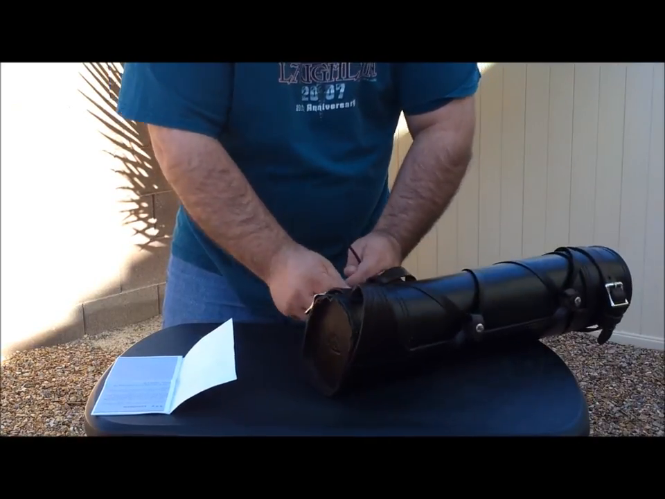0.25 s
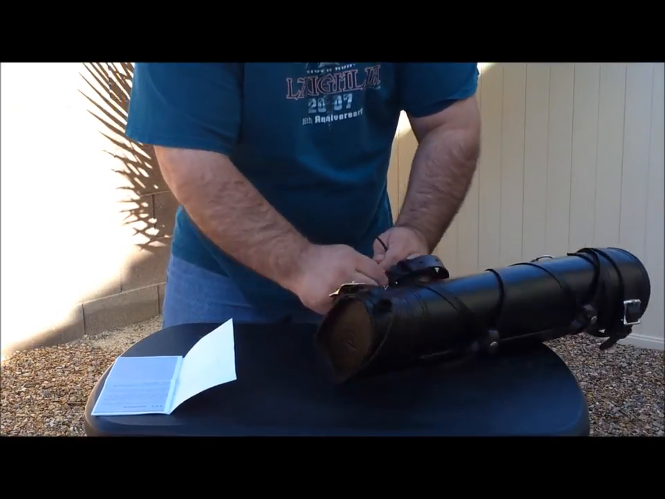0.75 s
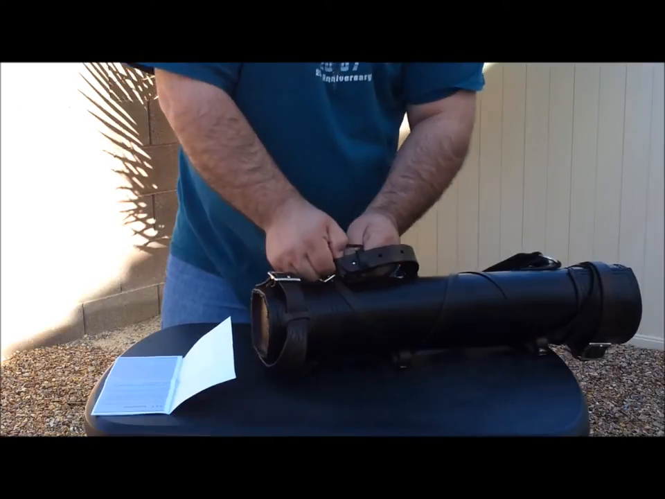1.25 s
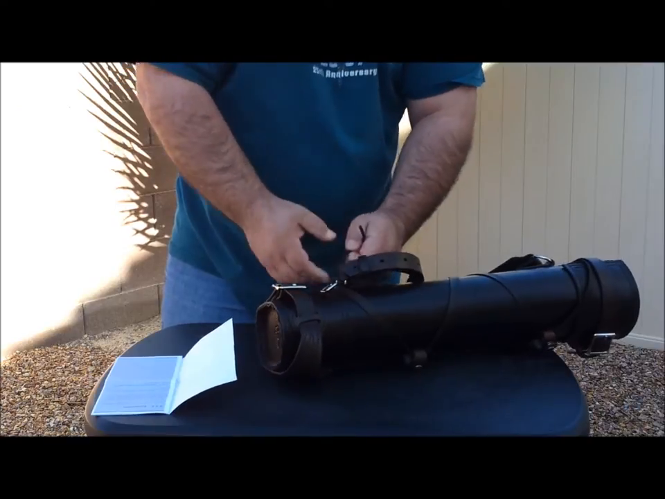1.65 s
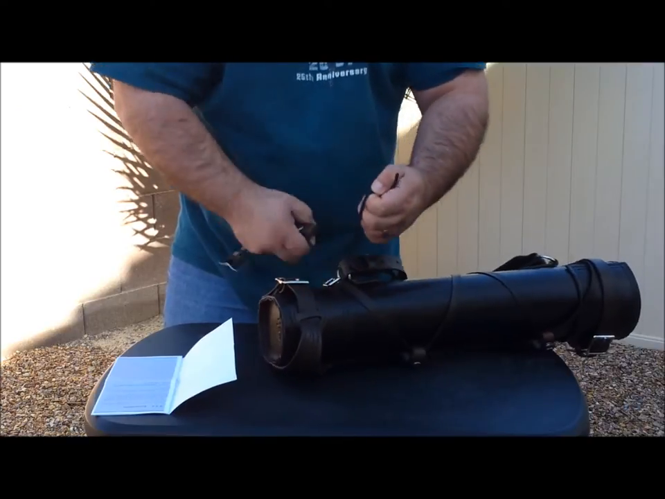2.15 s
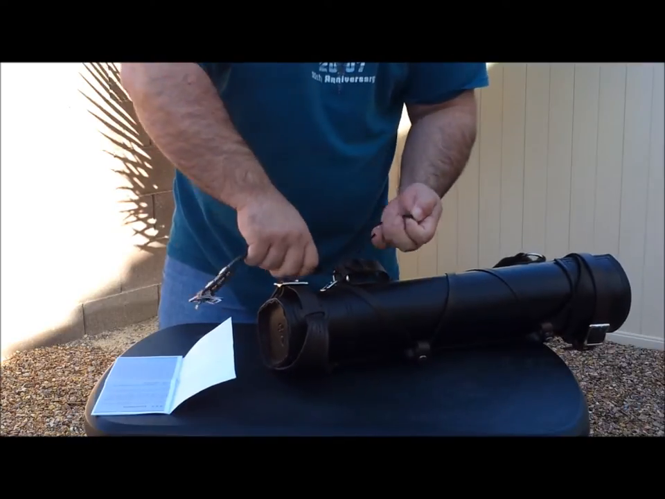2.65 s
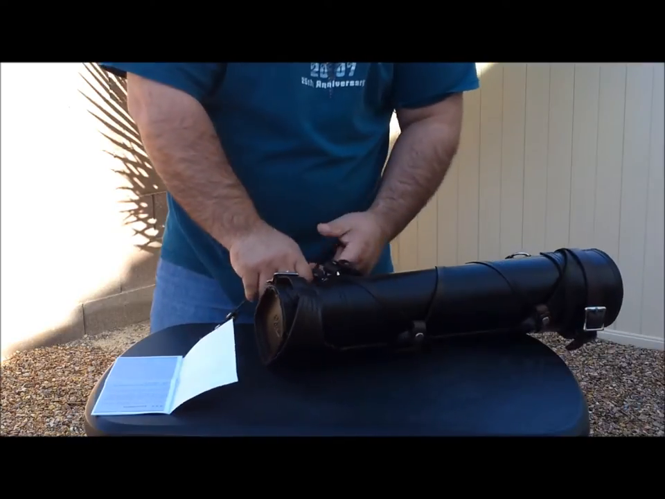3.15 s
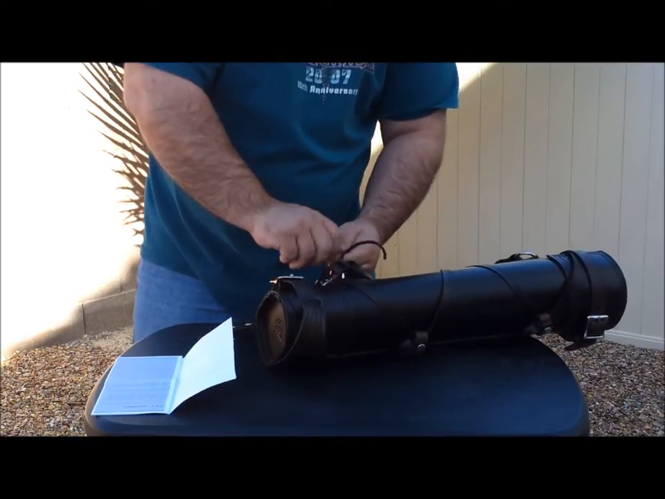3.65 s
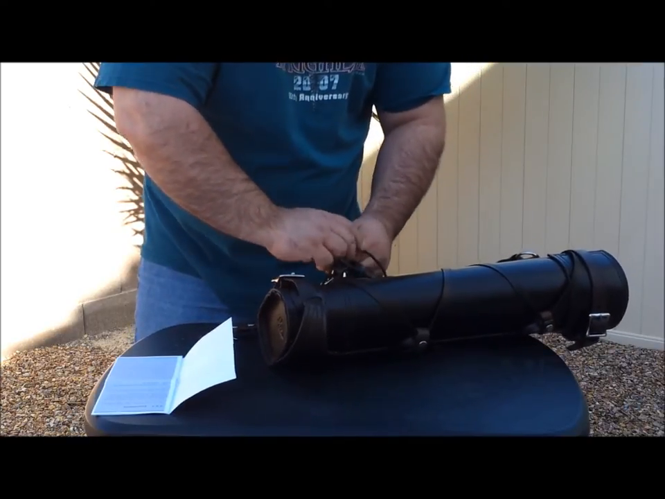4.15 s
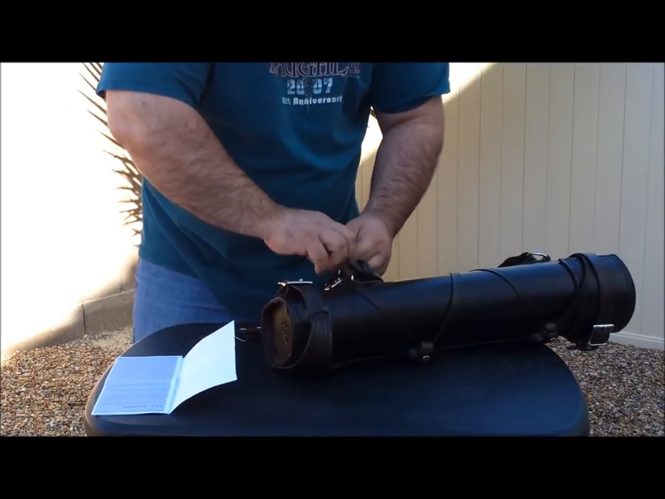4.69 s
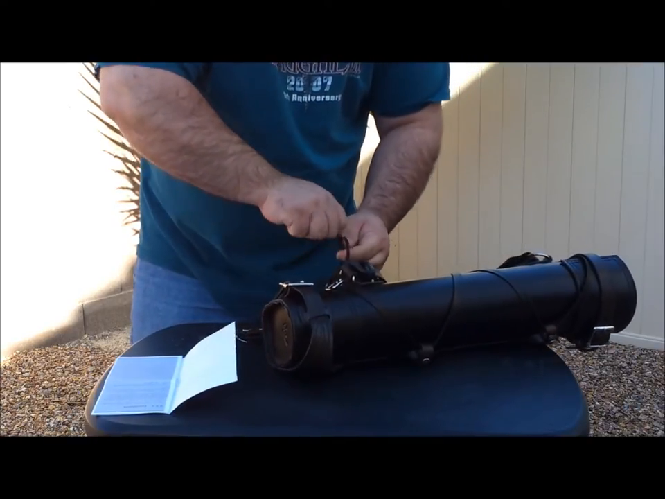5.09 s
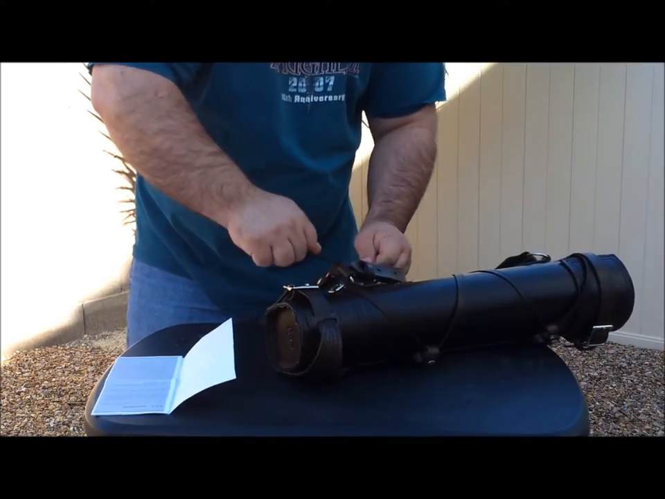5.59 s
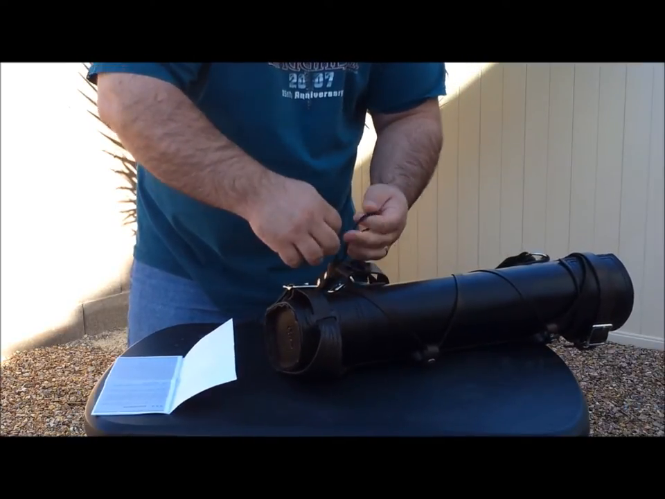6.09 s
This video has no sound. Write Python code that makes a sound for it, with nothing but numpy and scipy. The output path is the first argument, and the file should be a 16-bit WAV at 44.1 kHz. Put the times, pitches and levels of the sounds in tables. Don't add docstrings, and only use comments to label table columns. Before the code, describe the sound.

Close outdoor handling of a leather case on a plastic table. Fingers rustle over straps with small dry ticks, then a knock at two seconds and a harder double knock with buckle clinks at three. Soft bumps and quieter rubbing follow, until a sharp snap, clatter and scraping drag with jingling near five and a half. Faint traffic and microphone hiss stay underneath, with a slight fence reflection.

```python
import sys
import numpy as np
from scipy import signal
from scipy.fft import rfft, irfft, next_fast_len
from scipy.io import wavfile
from scipy.ndimage import uniform_filter1d, map_coordinates

SR = 44100
rng = np.random.default_rng(int(sys.argv[2]) if len(sys.argv) > 2 else 0)


def generate_wav(sig):
    pcm = np.round(np.clip(np.atleast_2d(sig).T, -1, 1) * 32767).astype(np.int16)
    wavfile.write(sys.argv[1], SR, pcm)


def amplitude_ratio(level_db):
    exponent = np.asarray(level_db, float) / 20
    return 10 ** exponent


N = 279136


def unit_size(z):
    return np.sqrt(np.mean(abs(z) ** 2))


def unit(x):
    return x / (unit_size(x) + 1e-10)


def along(points, hz):
    f, v = np.transpose(points)
    return np.interp(np.log(hz + 1), np.log(f + 1), v)


def wobble(rate_hz):
    knots = rng.standard_normal(int(N * rate_hz / SR) + 4)
    return map_coordinates(knots, [np.arange(N) * rate_hz / SR])


def filtered(x, response):
    m = next_fast_len(x.shape[-1] + 8192)
    return irfft(rfft(x, m) * response(np.fft.rfftfreq(m, 1 / SR)), m)[..., :x.shape[-1]]


def noise_through(response, length=N):
    return unit(filtered(rng.standard_normal(length), response))


def resonance(f, hz, width_hz):
    return 1j * f * width_hz / (hz * hz - f * f + 1j * f * width_hz)


def body(modes):
    return lambda f: sum((-1) ** k * amplitude_ratio(db) * resonance(f, hz, 1.28 * width_hz)
                         for k, (hz, width_hz, db) in enumerate(modes))


def ring(t, hz, t60_s, chatter):
    shake = 1 + chatter * 10 * uniform_filter1d(rng.standard_normal(len(t)), size=100)
    onset = 1 - np.exp(-t / 0.00048)
    return shake * np.sin(2 * np.pi * hz * t) * amplitude_ratio(-60 * t / t60_s) * onset


def patchy(x, patchy_db):
    z = signal.stft(x, nperseg=512)[2]
    field = uniform_filter1d(rng.standard_normal(z.shape), size=4, axis=0)
    field = uniform_filter1d(field, size=10, axis=1)
    return signal.istft(z * amplitude_ratio(patchy_db * unit(field)), nperseg=512)[1][:N]


def add(track, start_s, sound):
    track[round(start_s * SR):][:len(sound)] += sound


# freq_hz, density_db
RUMBLE = [(27, -55), (50, -7), (75, -2), (240, -2.5), (400, -11), (800, -20.5), (1600, -31.5), (3520, -120)]
# centre_hz, width_hz, level_db
ENGINES = [(80.7, 16.5, -66.5), (118.6, 22, -71), (159.7, 14, -69.5), (218.5, 24, -68.5)]
# freq_hz, density_db
HISS = [(530, -25), (900, -10), (6560, -9), (7660, -4), (8740, -9), (12400, -3), (14600, -9.5),
        (15700, -48)]


def air():
    traffic = noise_through(lambda f: amplitude_ratio(along(RUMBLE, f)))
    traffic_db = -57.0 + 0.24 * wobble(1.55) + 0.29 * wobble(7)
    drones = np.zeros(N)
    for hz, width_hz, db in ENGINES:
        drone = noise_through(lambda f: resonance(f, hz, width_hz) ** 2)
        drones += amplitude_ratio(db + 2.9 * wobble(1.41)) * drone
    hiss = noise_through(lambda f: amplitude_ratio(along(HISS, f)))
    return amplitude_ratio(traffic_db) * traffic + drones + amplitude_ratio(-69.5) * hiss


def effort(moves):
    peak_s, rise_s, fall_s, db, second_over_db = np.transpose(moves)[..., None]
    late_s = np.arange(0, N / SR + .01, .002) - peak_s
    swell = amplitude_ratio(2 * (db - 20 * np.maximum(late_s / fall_s, -late_s / rise_s)))
    return swell.sum(axis=0), (swell * amplitude_ratio(2 * second_over_db)).sum(axis=0)


def grit(grain_db):
    slips = uniform_filter1d(rng.standard_normal(N), size=24) * np.sqrt(24)
    return rng.standard_normal(N) * amplitude_ratio(grain_db * np.clip(slips, -3, 2))


# freq_hz, density_db
FINGERS = [(2940, -40), (5000, -5.5), (6930, -5), (8220, -4.5), (12300, 6.5), (14400, -0.5), (15100, -29),
           (15500, -62)]
# freq_hz, density_db
RUB = [(1500, -13), (2600, 0.5), (4100, 1), (6000, -6), (8500, -10.5), (13000, -18)]
# centre_hz, width_hz, level_db
TABLE = [(948, 80, -2.5), (1267, 85, 1.5), (1698, 130, -3.5), (2176, 57, -2), (2414, 37, -6.5),
         (3000, 52, -18)]
# centre_hz, width_hz, level_db
CASE = [(487, 51, -1), (634, 42, -0.5), (846, 164, -3), (1208, 55, -6.5), (1696, 32, -9)]
# peak_s, rise_s, fall_s, skin_db, leather_over_skin_db
STROKES = [(.098, .16, .14, -72.5, -3), (.362, 0.14, 0.1, -58, -10), (.52, 0.078, 0.82, -66, -9.5),
           (.87, 0.36, 0.099, -59.5, -5.5), (.972, 0.27, 0.62, -57.5, -8), (1.31, 0.25, 0.056, -63.5, -16),
           (1.436, 0.079, 1.1, -62.5, -7.5), (1.7, 0.13, 1.4, -69, -4), (1.96, 0.06, 0.23, -58.5, -10),
           (2.204, 0.19, 0.23, -56, -18), (2.27, .1, 0.093, -64, -7), (2.628, .06, 0.11, -62, -17),
           (2.866, .6, 0.94, -68, -7.5), (3.282, 0.059, 0.022, -63, -5), (3.25, .15, 0.19, -71, 3),
           (3.62, 0.1, 0.31, -65, -5), (3.812, 0.046, 0.049, -64, -17), (4.166, 0.12, 0.67, -69, -12),
           (4.6, 0.18, .03, -63, -8), (4.8, 0.61, 1.3, -70.5, -10.5), (5.335, 0.14, 0.22, -56.5, -14),
           (5.46, 0.11, 0.018, -56, -7), (5.66, 0.13, 0.16, -60, 0.5), (5.738, .3, 0.037, -68, -7)]
# peak_s, rise_s, fall_s, table_db, case_over_table_db
SHIFTS = [(.098, .28, .25, -74, 1), (.362, .3, 0.21, -67, 0.5), (.694, 0.36, 1.8, -68, 2.5),
          (.95, 0.13, 0.35, -64, 1.5), (1.436, 0.22, 1, -69.5, 1.5), (1.7, 0.096, 1.5, -80, 1),
          (1.96, 0.12, 0.13, -73.5, -4), (2.1, 0.077, 0.12, -57, -5), (2.27, 0.3, 0.32, -72, 4),
          (2.63, .2, 0.4, -77.5, 6), (3.07, 0.16, 0.07, -58, -5), (3.28, .35, .08, -67.5, 10.5),
          (3.42, 0.044, 0.13, -70, 9), (3.56, 0.17, 0.18, -75, 12.5), (3.64, 0.06, 0.18, -63, 8),
          (3.73, 0.089, 0.089, -66, 11), (3.85, 0.025, 0.039, -69, -9), (4.17, 0.17, 0.82, -78, 8),
          (4.44, 0.83, 0.023, -76.5, 8.5), (4.6, 0.14, .03, -71, 7), (5.335, 0.054, 0.35, -70.5, 14.5),
          (5.48, 0.065, 0.22, -51.5, 0), (5.66, 0.2, 0.13, -49, -8), (5.75, .3, 0.057, -56.5, 0.5),
          (6.054, 0.21, 0.38, -73.5, 4)]
REST_DB = [-75.5, -84, -82.5, -79.5]


def handling():
    skin, leather = effort(STROKES)
    table, case = effort(SHIFTS)
    leather = leather + amplitude_ratio(2 * -10.5) * table
    powers = np.array([skin, leather, table, case]) + amplitude_ratio(2 * np.array(REST_DB))[:, None]
    step = np.arange(N) / SR * 500
    finger_gain, rub_gain, drag_gain, rock_gain = [
        np.interp(step, np.arange(len(p)), np.sqrt(p)) for p in powers]

    fingers = unit(filtered(grit(grain_db=3), lambda f: amplitude_ratio(along(FINGERS, f))))
    rub = unit(filtered(grit(grain_db=3.5), lambda f: amplitude_ratio(along(RUB, f))))
    drag = unit(filtered(grit(grain_db=3.5),
                         lambda f: body(TABLE)(f) + 0.26 * resonance(f, 1840, 2100) ** 2))
    rock = unit(filtered(grit(grain_db=3),
                         lambda f: body(CASE)(f) + 0.13 * resonance(f, 670, 820) ** 2))
    jerk = amplitude_ratio(0.48 * wobble(25))
    strap_and_case = rub_gain * rub + drag_gain * drag + rock_gain * rock
    return amplitude_ratio(1.2 * wobble(27)) * finger_gain * fingers + jerk * strap_and_case


# start_s, peak_db, pitch_hz
TAPS = [(.708, -57, 1030), (1.511, -46.5, 1300), (2.812, -60, 826), (3.404, -54, 864), (3.854, -41.5, 1260),
        (5.362, -41, 1710), (5.641, -42, 1750)]
# start_s, peak_db, pitch_hz
CREAKS = [(.9492, -46, 5500), (.9633, -41, 4600), (.9641, -40, 6850), (.9695, -45, 6000),
          (.9827, -40, 5600), (1.0122, -36.5, 5740), (1.033, -48.5, 5190), (1.0427, -40, 5530),
          (1.0768, -40, 5640), (1.09, -51, 4200), (1.0932, -44, 5160), (1.401, -49, 4760),
          (1.4666, -45, 6870), (2.1304, -46, 4650), (2.2747, -36, 5800), (2.8275, -52, 5300),
          (3.4221, -53, 4740), (3.5498, -55, 4890), (3.6267, -54, 4550), (4.5585, -53, 5640),
          (4.5944, -54, 4910), (5.347, -35, 4730), (5.432, -22, 4950), (5.4363, -28, 4870),
          (2.9563, -30, 3700)]
# start_s, peak_db, pitch_hz
SNAPS = [(.9492, -33, 12500), (0.9633, -26, 13000), (1.0122, -45, 12500), (1.394, -45.5, 10000),
         (1.466, -34, 12000), (1.5024, -43, 12100), (2.1368, -36, 12900), (2.2684, -48, 12400),
         (2.2742, -42, 13200), (2.6364, -46, 12700), (2.7545, -40, 13100), (2.76, -41, 12700),
         (2.827, -35, 13300), (3.1832, -44, 12100), (3.2799, -46, 12300), (3.327, -30, 12200),
         (3.709, -50, 9400), (3.803, -52, 12200), (3.81, -51, 13500), (3.817, -50, 13400),
         (5.4325, -12, 12700), (0.946, -39, 12000), (4.6608, -44, 12690), (5.4874, -49, 11400),
         (5.5044, -46, 11400), (5.7084, -44, 12900), (5.7805, -48, 12500), (6.0494, -52, 12100)]
TICK_CYCLES = [5.1, 4.9, 13]


def ticks():
    track, t = np.zeros(N + SR), np.arange(SR // 40) / SR
    overtone_ratio, overtone_db = 1.84, [-17, -6, -70]
    for rows, cycles, over_db in zip([TAPS, CREAKS, SNAPS], TICK_CYCLES, overtone_db):
        for start_s, db, hz in rows:
            u = 6 * t * hz / cycles
            tone = np.sin(2 * np.pi * hz * t)
            overtone = amplitude_ratio(over_db) * np.sin(2 * np.pi * overtone_ratio * hz * t)
            add(track, start_s, amplitude_ratio(db + 7.0) * (tone + overtone) * u * np.exp(-u))
    return track[:N]


# freq_hz, t60_s
FENCE = [(200, 0.12), (1000, 0.26), (4000, 0.46), (12000, 0.16)]


def fence(x):
    frames = dict(nperseg=256, noverlap=192)
    hz, t, z = signal.stft(np.pad(x, (400, 0))[:N], SR, **frames)
    decay = amplitude_ratio(-120 * t[:300] / along(FENCE, hz)[:, None])
    decay = decay / decay.sum(axis=1, keepdims=True)
    power = signal.fftconvolve(abs(z) ** 2, decay, axes=1)[:, :len(t)]
    noise = signal.stft(rng.standard_normal(N), SR, **frames)[2]
    return signal.istft(np.sqrt(abs(power)) * noise / unit_size(noise), SR, **frames)[1][:N]


# start_s, level_db, pitch_hz
NUDGES = [(3.166, -51.5, 1010), (3.185, -55, 1690), (3.2, -50.5, 550), (3.222, -55, 1680),
          (3.232, -48, 485), (3.25, -50, 900), (3.26, -56.5, 1700), (3.268, -53, 1160), (3.285, -51, 850),
          (3.29, -50, 500), (3.305, -59.5, 1690), (3.403, -51.5, 900), (3.42, -51, 850),
          (3.432, -50.5, 590), (3.49, -59.5, 840), (3.53, -54, 620), (3.553, -51, 610), (3.555, -64, 1690),
          (3.585, -56, 600), (3.612, -57.5, 1680), (3.626, -46, 860), (3.643, -46, 900), (3.65, -50, 1210),
          (3.665, -49.5, 860), (3.685, -56.5, 1720), (3.703, -48, 880), (3.705, -55, 1690),
          (3.714, -44.5, 600), (3.722, -48, 484), (3.74, -52, 600), (3.75, -59.5, 1700), (3.856, -55, 1250),
          (.93, -55, 1150), (.975, -56, 1150), (1.03, -56, 1100), (1.1, -57, 1150), (5.358, -43, 1700),
          (5.361, -44, 1050), (5.367, -45, 700), (5.508, -49, 1700), (5.638, -44, 1700), (5.725, -50, 1700),
          (5.745, -50, 1700)]


def nudges():
    rise_s, spread = .0055, .4
    track, u = np.zeros(N + SR), np.arange(SR // 10) / SR / rise_s
    for start_s, db, hz in NUDGES:
        rough = noise_through(lambda f: body(CASE)(f) * resonance(f, hz, spread * hz) ** 2, len(u))
        add(track, start_s, amplitude_ratio(db - 4.0) * u * np.exp(1 - u) * rough)
    return track[:N]


# start_s, level_db, thud_over_db, crack_over_db, t60_s
KNOCKS = [(.9484, -61, 2, 8, 0.14), (2.0339, -36.5, -9, 1, .1), (2.0376, -37.5, -8, -4, 0.23),
          (2.956, -33.5, 0, -3.5, 0.12), (2.9702, -35.5, -2, 12.5, 0.14), (2.9845, -40.5, -6, -1, 0.2),
          (2.9964, -46.5, -5, -6, 0.2), (3.6274, -50.5, -3, -5, 0.052), (3.708, -72, 9, 11, 0.14),
          (4.5601, -64, 10, 13.5, 0.18), (5.3478, -52, 2, 10.5, .16), (5.3585, -45, -4, -6, 0.12),
          (5.4325, -34, -9, 6, .05), (5.4356, -37, 2, 3, 0.12), (5.4455, -38, -5, -3, 0.1),
          (5.4192, -51, -6, -1, 0.4), (3.311, -72, 12, 26, 0.23), (5.4265, -42, -5, -6, .3)]
# freq_hz, gain_db
SLAP = [(60, -30), (200, 0), (2400, -0.5), (3200, -5.5), (4100, 1.5), (5200, -4), (7000, -0.5)]
# pitch_hz, level_db, t60_s
CASE_END = [(242, -39, 0.14), (508, -38, 0.11), (731, -28.5, 0.13), (912, -33, 0.11), (1030, -31, 0.057),
            (1290, -32.5, 0.074), (2380, -42, .076), (2940, -30.5, .047), (800, -40.5, 0.23),
            (1910, -43, .2), (2240, -38, 0.065), (3760, -48, .1), (4090, -37, 0.025), (5450, -46, .07)]
TABLE_RIM = [(286.5, -33, 0.16), (353, -34.5, 0.049), (1100, -38.5, 0.2), (1675, -38, 0.15),
             (2080, -39, 0.18), (2740, -40.5, 0.094), (3780, -28.5, 0.019)]
CASE_SIDE = [(304, -39, 0.15), (720, -53, 0.067), (960, -28.5, 0.074), (1080, -30.5, 0.054),
             (1380, -38, .09), (1960, -26, .04), (2156, -24, .035), (2400, -32.5, 0.037)]
TOP_STRUCK = [(271, -40, 0.16), (1147, -42, 0.14), (1373, -38, 0.095), (1658, -34, 0.09), (2126, -46, .15),
              (4780, -48, .1), (5550, -51, .1), (6150, -48, .12), (6826, -47, 0.092)]
NUDGED = [(900, -52, .15), (2130, -55, .09)]
# (pitch_hz, level_db, t60_s)
BLOWS = [
    (2.0345, CASE_END),
    (2.957, TABLE_RIM),
    (2.9715, TOP_STRUCK),
    (5.433, CASE_SIDE),
    (3.629, NUDGED),
]


def knocks():
    track, t = np.zeros(N + SR), np.arange(SR // 5) / SR
    # centre_hz, width_hz, share of t60
    bands = [(480, 520, 0.79), (1600, 1620, 0.52), (4500, 5400, 0.28), (12000, 7500, 0.38)]
    for start_s, db, thud_db, crack_db, t60_s in KNOCKS:
        levels_db = [db + thud_db, db, db + 0.63 * crack_db + 2.5, db + crack_db]
        rattle = np.zeros(len(t))
        for (hz, width_hz, share), level_db in zip(bands, levels_db):
            noise = noise_through(lambda f: resonance(f, hz, width_hz) ** 2, len(t))
            rattle += amplitude_ratio(level_db - 60 * t / (t60_s * share)) * noise
        add(track, start_s, rattle * (1 - np.exp(-t / 0.00023)))
    track = filtered(track, lambda f: amplitude_ratio(along(SLAP, f)))
    for start_s, modes in BLOWS:
        for hz, db, t60_s in modes:
            add(track, start_s, amplitude_ratio(db) * ring(t, hz, t60_s, chatter=0.27 + hz / 9000))
    return track[:N]


# pitch_hz, t60_s
STEEL = [(4150, 0.072), (3900, .05), (9000, 0.13), (9310, .08), (9860, 0.12), (10260, 0.05), (10590, 0.063),
         (11410, 0.088), (12330, 0.11), (12900, 0.058), (8050, .09), (13800, .05)]
# start_s, level_db, favoured_hz, ring_time_ratio
CLINKS = [(2.0381, -33.5, 11470, .46), (2.0451, -45.5, 10210, .71), (2.9601, -40.5, 9320, 1.05),
          (2.9602, -39.5, 10600, .71), (2.9591, -37.5, 12340, 1.05), (2.9701, -41.5, 13110, .61),
          (2.9711, -40.5, 4140, 1.55), (2.9931, -46.5, 4090, 3.4), (2.9831, -35.5, 12340, .31),
          (3.3101, -52, 4140, .9), (3.3121, -50.5, 10210, 1.35), (3.3281, -44.5, 10410, .71),
          (3.3102, -46.5, 11420, .81), (3.3103, -43, 12340, 1.9), (5.3585, -43, 4140, .36),
          (5.3501, -52.5, 9010, 1.05), (5.3502, -43, 9870, 1.45), (5.3521, -49.5, 10600, 1.45),
          (5.3401, -43, 11420, 1.15), (5.3475, -32, 11420, .8), (5.3621, -45.5, 12340, 1.9),
          (5.4191, -42.5, 9870, .91), (5.4192, -38.5, 12340, .31), (5.4331, -32.5, 11420, 1.35),
          (5.4391, -31, 11420, 1.25)]
# start_s, level_db, favoured_hz, ring_time_ratio
JINGLES = [(5.569, -62, 9860, 3), (5.618, -50, 9860, 0.32), (5.6245, -54, 9860, .25),
           (5.632, -52, 9860, .45), (5.646, -53, 9860, .4), (5.66, -56, 9860, .4), (5.667, -51, 9860, .4),
           (5.59, -63, 10590, 1), (5.62, -61, 12330, 1.5), (5.637, -56, 12330, .4),
           (5.674, -53, 12330, .25), (5.684, -51, 12330, .2), (5.642, -58, 8050, .6),
           (5.651, -55, 8050, .3), (5.665, -50, 8050, .15), (5.673, -53, 8050, .2), (5.708, -59, 8050, .8),
           (5.676, -55, 10590, 1.5), (5.69, -55, 13800, .3), (5.7085, -47, 12330, .35),
           (5.709, -52, 9310, .4), (5.711, -54, 10590, .8), (5.711, -56, 11410, .3),
           (5.721, -47.5, 10680, 2), (5.723, -53, 11410, .9), (5.724, -54, 12330, .3),
           (5.733, -52, 12330, 1), (5.76, -61, 10800, 2), (5.78, -55, 10590, .4)]
MUTES = [2.05, 2.969, 3.003, 3.336, 5.4, 5.432, 5.483, 5.676, 5.75, 5.786, 6.3]


def buckle():
    track, t = np.zeros(N + SR), np.arange(SR // 7) / SR
    spill_db_per_khz = 15
    for start_s, db, near_hz, lasts in CLINKS + JINGLES:
        touch_s = min(m for m in MUTES if m > start_s + .004) - start_s
        damping = amplitude_ratio(-np.clip((t - touch_s) * 4000, 0, 16))
        woken = sorted(STEEL, key=lambda mode: abs(mode[0] - near_hz))[:2]
        for hz, t60_s in woken:
            mode_db = db - spill_db_per_khz * abs(hz - near_hz) / 1000
            add(track, start_s, damping * amplitude_ratio(mode_db) * ring(t, hz, t60_s * lasts, chatter=0.21))
    return track[:N]


def shiver():
    centre_s, spread_s, level_db, width_hz = 5.67, .05, -70, 200
    swell = np.exp(-.5 * ((np.arange(N) / SR - centre_s) / spread_s) ** 2)
    modes = np.zeros(N)
    for hz in [9310, 10300, 11410, 12330]:
        line = noise_through(lambda f: resonance(f, hz, width_hz) ** 2)
        modes += amplitude_ratio(6 * wobble(45)) * line
    return amplitude_ratio(level_db) * swell * modes


def scene():
    hits = ticks() + nudges() + knocks() + buckle() + shiver()
    yard = hits + amplitude_ratio(-13.5) * fence(hits)
    mix = yard + patchy(handling(), patchy_db=1.57) + patchy(air(), patchy_db=1.07)
    return np.tile(mix, (2, 1))


# centre_s, level_under_sound_db
SPLITS = [(1.431, -22), (1.495, -22), (2.047, -17), (2.152, -18), (2.3, -20), (2.86, -20), (3.005, -9.5),
          (5.43, -13.5)]
# centre_s, centre_hz
NARROW_SPLITS = [(.127, 10100), (.797, 12800), (.916, 9000), (1.66, 13800), (2.424, 12600), (3.89, 11000),
                 (5.28, 11700)]


def side_difference(mono):
    frame_s, band_hz, narrow_db = 0.043, 3000, -5
    hz, t, z = signal.stft(mono, SR, nperseg=256)
    wide = sum(amplitude_ratio(db) * (abs(t - centre_s) < .5 * frame_s) for centre_s, db in SPLITS)
    share = wide * (0.6 + hz[:, None] / 5000).clip(0, 1.6)
    for centre_s, centre_hz in NARROW_SPLITS:
        in_band = abs(hz - centre_hz) < .5 * band_hz
        share = share + amplitude_ratio(narrow_db) * np.outer(in_band, abs(t - centre_s) < .4 * frame_s)
    scrambled = z * share * np.exp(2j * np.pi * rng.random(z.shape))
    return signal.istft(scrambled, SR, nperseg=256)[1][:N]


def band_limit(x):
    return signal.sosfilt(signal.butter(12, 15850, fs=SR, output="sos"), x)


def record(dry):
    mono = filtered(dry[0], lambda f: amplitude_ratio(np.clip((14580 - f) * 0.32, -40, 0)))
    difference = side_difference(mono)
    return band_limit(np.array([mono + difference, mono - difference]))


dry = scene()
out = record(dry)
generate_wav(out)
```